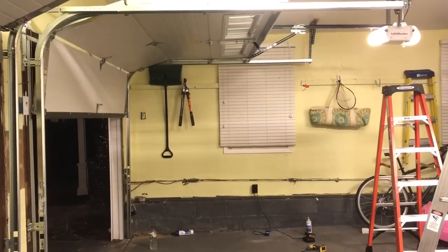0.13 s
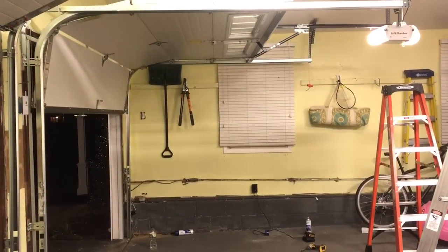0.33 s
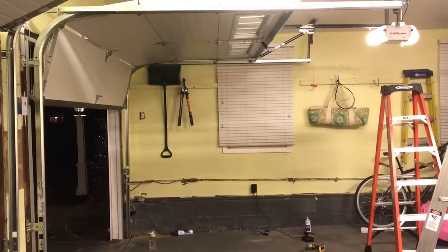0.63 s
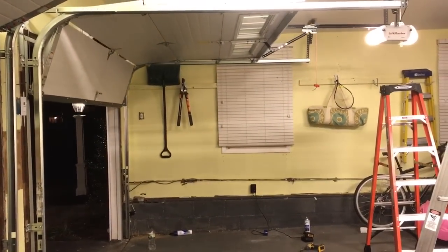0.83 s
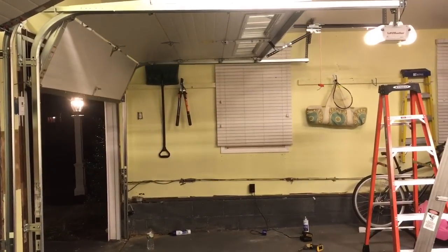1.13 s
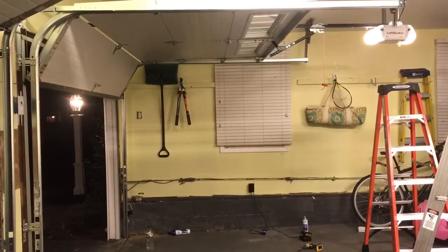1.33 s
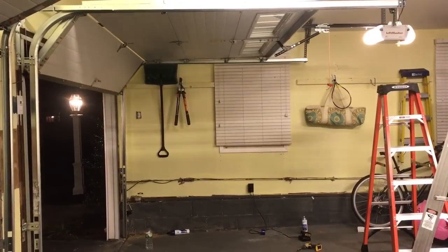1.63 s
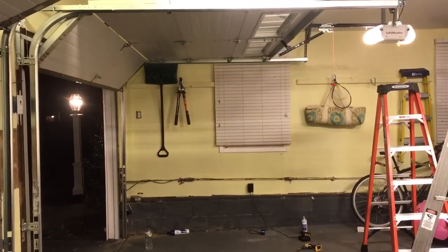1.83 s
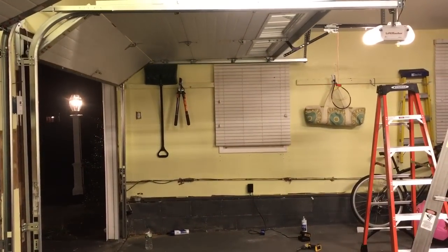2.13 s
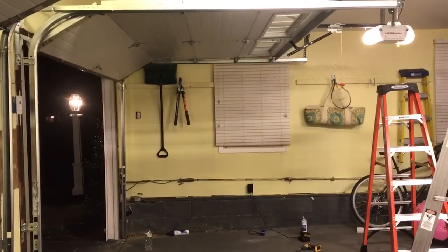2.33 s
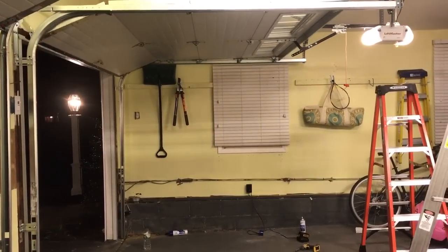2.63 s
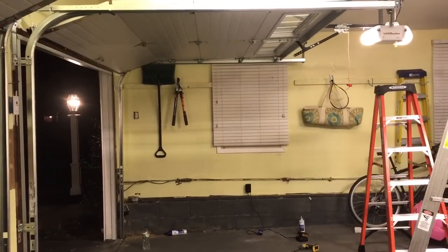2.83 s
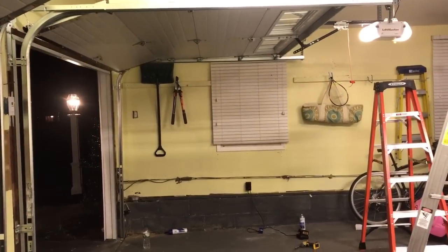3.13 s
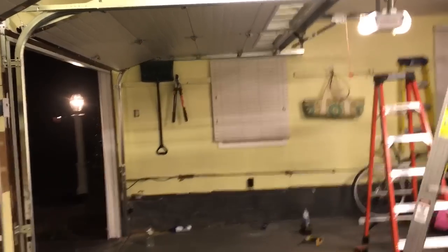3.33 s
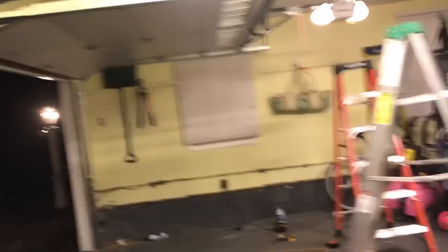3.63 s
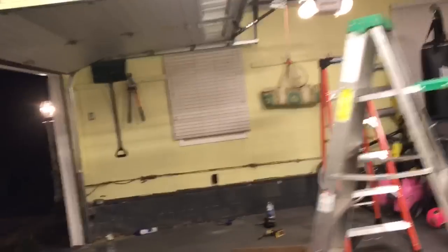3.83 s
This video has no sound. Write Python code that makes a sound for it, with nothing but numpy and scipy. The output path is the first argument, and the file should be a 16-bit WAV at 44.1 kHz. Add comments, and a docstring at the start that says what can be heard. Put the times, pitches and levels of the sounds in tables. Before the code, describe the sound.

A garage door opener drones with a low electric hum and faint gear whine while door panels rumble, rollers grind and fittings rattle. Small clanks begin around 1.3 seconds; louder, chattering metal clanks with a short squeal and creak come at 2.1-2.6. At about 2.9 the motor cuts out and the door shudders low, fading into quiet air. Light clicks and a soft rub near the microphone follow around 3.75.

```python
"""A motor hums at twice the mains rate over a gear whine: an opener pulls a sectional door up its tracks.
Filtered noise makes the panel rumble, roller grind and rattle; decaying modes and noise make the clanks.
Rollers squeal and a hinge creaks in the bend; the motor cuts out and the door shudders to rest.
Light clicks and a soft rub follow near the microphone; faint air noise and tones lie under it all."""
import sys
import numpy as np
from scipy import signal
from scipy.fft import rfft, irfft, next_fast_len
from scipy.io import wavfile
from scipy.ndimage import map_coordinates

SR = 44100
rng = np.random.default_rng(int(sys.argv[2]) if len(sys.argv) > 2 else 0)


def materialize(psi):
    """Save the field psi as 16-bit PCM at rate SR to the path in sys.argv[1].

    A 1-D psi becomes a single channel; in a 2-D psi each row is a channel.
    """
    bounded = np.clip(np.atleast_2d(psi).T, -1, 1)
    quanta = np.round(bounded * 32767).astype(np.int16)
    wavfile.write(sys.argv[1], SR, quanta)


N = 176400


def amp(db):
    """Decibels to gain."""
    return 10 ** (np.asarray(db) / 20)


def unit(x):
    """Scale to rms 1."""
    return x / np.sqrt(np.mean(x ** 2) + 1e-20)


def along(points, hz):
    """Interpolate (frequency [Hz], value) points on a log-frequency axis."""
    f, v = np.transpose(points)
    return np.interp(np.log(hz + 1), np.log(f + 1), v)


def curves(rows):
    """One value per sample for each column after the time."""
    time_s, *columns = np.transpose(rows)
    return [np.interp(np.arange(N) / SR, time_s, column) for column in columns]


def wobble(knots_per_s):
    """Smooth random curve: a spline through normal draws."""
    knots = rng.standard_normal(int(N * knots_per_s / SR) + 4)
    return map_coordinates(knots, [np.arange(N) * knots_per_s / SR])


def random_phase():
    """Uniform phase in radians."""
    return rng.uniform(0, 2 * np.pi)


def filtered(x, response):
    """Multiply the spectrum of x by a response of frequency."""
    m = next_fast_len(len(x) + SR // 4)
    return irfft(rfft(x, m) * response(np.fft.rfftfreq(m, 1 / SR)), m)[:len(x)]


def noise(colour, size=N):
    """Noise of rms 1 with a (frequency [Hz], level [dB]) spectrum."""
    return unit(filtered(rng.standard_normal(size), lambda hz: amp(along(colour, hz))))


def fade(t, t60):
    """Full level until t = 0, then exponential decay, 60 dB in t60 seconds."""
    return amp(-60 * np.maximum(t, 0) / t60)


def add(track, start_s, sound):
    """Mix a sound into the track in place."""
    part = track[round(start_s * SR):][:len(sound)]
    part += sound[:len(part)]


# reverberation of the hard-walled garage: (frequency [Hz], t60 [s])
GARAGE_T60 = [(150, 0.43), (1000, 0.49), (3000, 0.44), (6000, 0.43), (10000, .26), (16000, 0.14)]
WET_DB = 2  # tail energy against direct sound


def garage(x, wet_db):
    """Direct sound plus a fresh noise tail whose treble dies first; total energy stays about equal."""
    hz, t, z = signal.stft(rng.standard_normal(SR), SR, nperseg=256)
    decay = amp(-60 * t / along(GARAGE_T60, hz)[:, None])
    tail = signal.istft(z * decay, SR, nperseg=256)[1]
    response = amp(wet_db) * tail / np.linalg.norm(tail)
    response[0] += 1
    return signal.fftconvolve(x, response)[:N] / np.sqrt(1 + amp(wet_db) ** 2)


MAINS_HZ, SHAFT_HZ = 59.96, 29.27
SPEED_WANDER = .0011  # fraction of shaft speed per unit of wobble
HUM_WAVER_DB, OVERTONE_WAVER_DB, GEAR_WAVER_DB = 0.28, 1.7, 1.6
MESH_ORDER, MESH_DB, MESH_SWING_RAD = 48, -55, 0.82  # tooth whine, phase swing once a turn
STOP_S, WHINE_STOP_S = 2.862, 2.815  # current is cut; gear unloads
HUM_T60_S, WHINE_T60_S = .12, .2
# motor hum under load: (time [s], level [dB])
HUM_LEVEL = [(0, -33), (.1, -35.2), (.23, -33.5), (1.2, -32.5), (1.76, -31.4), (2.16, -29.9), (2.46, -32.5),
             (2.58, -31), (2.8, -33)]
# hum and overtones: (multiple of mains rate, level against hum [dB])
HUM_ORDERS = [(2, 0), (4, -18.5), (6, -29), (8, -35), (10, -41.5)]
# gear train tones: (multiple of shaft rate, level [dB])
GEAR_ORDERS = [(7, -64.5), (10, -61), (13, -69), (14, -64), (33, -67.5), (44, -73.5)]
# tooth whine: (time [s], level against MESH_DB [dB], throb depth once a turn [0-1])
MESH_COURSE = [(0, 2, 0.23), (.6, -1.5, 0.1), (1.1, -3, 0.27), (1.3, -1, 0.33), (1.55, -9, 0.7),
               (1.9, 2, 0.6), (2.1, -3.5, 0.2), (2.8, -1.5, .2)]


def motor():
    """Magnetic hum locked to the mains; the gear turns slightly off centre, so its whine swings once a turn."""
    t = np.arange(N) / SR
    mains = 2 * np.pi * MAINS_HZ * t + 0.044 * wobble(15)
    hum = np.zeros(N)
    for order, db in HUM_ORDERS:
        waver_db = HUM_WAVER_DB if order == 2 else OVERTONE_WAVER_DB
        hum += amp(db + waver_db * wobble(13)) * np.sin(order * mains + random_phase())

    shaft = 2 * np.pi * np.cumsum(SHAFT_HZ * (1 + SPEED_WANDER * wobble(7.2))) / SR
    gear = np.zeros(N)
    for order, db in GEAR_ORDERS:
        phase = order * shaft + 0.25 * wobble(15) + random_phase()
        gear += amp(db + GEAR_WAVER_DB * wobble(7.66)) * np.sin(phase)

    mesh_db, throb = curves(MESH_COURSE)
    mesh_gain = amp(MESH_DB + mesh_db + wobble(7.9)) * (1 + throb * np.sin(shaft))
    mesh = mesh_gain * np.sin(MESH_ORDER * shaft + MESH_SWING_RAD * np.sin(shaft))

    hum *= amp(curves(HUM_LEVEL)[0]) * fade(t - STOP_S, HUM_T60_S)
    whine = (gear + mesh) * fade(t - WHINE_STOP_S, WHINE_T60_S)
    return np.sqrt(2) * (hum + whine)  # sine levels are rms


# rolling door: (time [s], panel rumble [dB], roller noise [dB], rattle [dB])
ROLL_LEVELS = [(0, -48.5, -54.5, -59.5), (1.2, -48, -56, -61), (1.55, -49, -54, -58),
               (1.85, -53, -58.5, -59), (2.02, -49.5, -57, -62.5), (2.25, -49, -51.5, -57.5),
               (2.55, -49.5, -54, -58), (2.76, -48.5, -58, -62), (2.85, -47, -54, -59),
               (3.02, -56, -65.5, -67), (3.25, -72, -75, -97), (3.6, -89, -75, -100)]
# spectra of panels, rollers and rattle: (frequency [Hz], level [dB])
PANEL_COLOUR = [(110, -7), (150, 0), (200, 3.5), (260, 3), (320, 1), (400, -0.5), (470, -16), (650, -16),
                (1200, -47)]
ROLLER_COLOUR = [(300, -22), (470, -2), (580, -6), (730, 7.5), (900, -2), (1150, -3), (1500, -3.5),
                 (1900, -20), (2600, -28.5)]
RATTLE_COLOUR = [(1000, -47), (1800, 5.5), (2400, 0), (3100, 3.5), (3900, -1.5), (4550, -2), (4950, -9),
                 (5800, -4), (6800, -10), (7700, -12), (9300, -15.5), (10400, -21.5), (11400, -19),
                 (13000, -20), (16000, -11)]
# low swaying of the door: (time [s], level [dB])
SWAY_LEVEL = [(0, -45), (.5, -48), (.7, -42.5), (.95, -48.5), (1.9, -48.5), (2.4, -48.5), (2.8, -43.5),
              (2.95, -53.5), (3.25, -50), (3.5, -56), (3.7, -51.5), (4, -58)]
# sway spectrum: (frequency [Hz], level [dB])
SWAY_COLOUR = [(20, -26), (35, -7), (48, -7.5), (60, 3), (80, -0.5), (100, 1), (125, -7.5), (160, -14),
               (300, -55)]
# ticks of chain links and loose rollers; level against the steady rattle
TICKS_PER_S, TICKS_DB, TICK_T60_S, TICK_SCATTER_DB = 130, -1, 0.024, 4.5


def door():
    """Panels sway and rumble, rollers grind in the tracks, and chain and loose fittings tick densely."""
    panel_db, roller_db, rattle_db = curves(ROLL_LEVELS)
    chain = np.sin(np.pi * SHAFT_HZ * np.arange(N) / SR)  # half the shaft rate
    panels = amp(panel_db + 2.0 * wobble(12)) * noise(PANEL_COLOUR)
    rollers = amp(roller_db + wobble(10.2) + .5 * chain) * noise(ROLLER_COLOUR)

    strengths = amp(TICK_SCATTER_DB * rng.standard_normal(N))
    contacts = (rng.random(N) < TICKS_PER_S / SR) * strengths
    tick_decay = fade(np.arange(SR // 10) / SR, TICK_T60_S)
    ticks = signal.fftconvolve(contacts, tick_decay)[:N] * noise(RATTLE_COLOUR)
    ticks = amp(TICKS_DB) * unit(garage(ticks, WET_DB))
    rattle = amp(rattle_db + 0.12 * wobble(7)) * unit(noise(RATTLE_COLOUR) + ticks)

    sway = amp(curves(SWAY_LEVEL)[0] + 0.81 * wobble(9.06)) * noise(SWAY_COLOUR)
    return panels + rollers + rattle + sway


SHUDDER_S, SHUDDER_RISE_S = 2.85, .03  # onset, rise time constant
# modes of the halted door: (frequency [Hz], peak level before decay [dB], t60 [s])
SHUDDER_MODES = [(76.4, -44, 1.6), (102.1, -37, 0.95), (116, -37, .75), (176, -47, 0.55), (271, -53, 0.7),
                 (309, -49, 0.69), (790, -63, 3.2)]


def shudder():
    """The sudden halt sets decaying modes of the door ringing, each with a wavering phase."""
    t = np.maximum(np.arange(N) / SR - SHUDDER_S, 0)
    modes = np.zeros(N)
    for hz, db, t60 in SHUDDER_MODES:
        modes += amp(db) * fade(t, t60) * np.sin(2 * np.pi * hz * t + 0.31 * wobble(14))
    return (1 - np.exp(-t / SHUDDER_RISE_S)) * modes


# hinge and roller clanks: (time [s], gain [dB], body [dB], middle [dB], treble [dB],
# noise t60 [s], bright snap against gain [dB])
CLANKS = [(1.277, -58, 4, 2, -7, 0.073, -25), (1.500, -55.5, -5, 5.5, 2, 0.29, -6),
          (1.707, -57, 0, 3, 0, 0.15, -17), (1.776, -55.5, 6, 3.5, 1.5, 0.21, -14),
          (2.167, -49.5, 3, 0, -5, 0.092, -1), (2.205, -44, -11, -12, -9, .08, -24),
          (2.290, -40, 4.5, 2, 1, 0.082, 3.5), (2.424, -41, 3, -1.5, -0.5, 0.094, -6),
          (2.545, -57.5, 13, 7.5, -8, 0.11, -25), (2.5829, -43, 7, 8.5, -1, 0.062, -4),
          (2.625, -54, 0, 0, -4, 0.08, -25), (2.865, -62.5, 13, 8.5, -7, 0.18, -25),
          (3.141, -65.5, -9, -8, -6, 0.018, -10)]
# spectrum of the clank noise: (frequency [Hz], level [dB])
CLANK_COLOUR = [(200, -49), (550, -17), (820, 6.5), (1200, 4.5), (1700, 3.5), (2600, -1), (3700, -1.5),
                (4500, -2), (5000, -7), (6400, -3), (7600, -7), (8500, -9), (9300, -16), (11100, -11),
                (13000, -28), (16000, -36)]
# ringing of hinge and track: (frequency [Hz], relative level [dB], t60 [s])
STEEL_MODES = [(837, 2, .2), (1124, -2, .3), (1556, -4, 0.12), (1700, -8, .2), (1935, -1.5, 0.15),
               (2416, -4.5, .2), (3210, -9, .15), (3805, -6, 0.17), (4570, -9, .15), (5050, -7, 0.072),
               (6340, -4, .07), (6360, -3, 0.065), (8500, -8, .08), (11400, 0, 0.088)]
# spectrum of the steel-on-steel snap: (frequency [Hz], level [dB])
SNAP_COLOUR = [(4000, -23), (6400, 4), (7500, -3), (8500, -6), (9300, -10), (11100, -3), (12800, -22),
               (14000, -14), (16000, -16)]
STEEL_DB, MODE_SCATTER_DB, ATTACK_S = -6.5, 2.5, .0005  # ring, its scatter, rise time constant
CRACK_DB, CRACK_T60_S = 6.5, 0.0087  # each chatter contact
CHATTER_S, CHATTER_LOSS_DB = .0075, 4  # nominal gap, loss per contact of a loose hinge
SNAP_T60_S, SNAP_WET_DB = .04, -4


def steel_ring(t):
    """Struck hinge and track: decaying modes with scattered levels, scaled by their first 20 ms."""
    ring = np.zeros(len(t))
    for hz, db, t60 in STEEL_MODES:
        gain = amp(db + rng.normal(0, MODE_SCATTER_DB))
        ring += gain * fade(t, t60) * np.sin(2 * np.pi * hz * t + random_phase())
    return amp(STEEL_DB) * ring / np.std(ring[:SR // 50])


def chatter_envelope(t):
    """A loose hinge strikes and bounces three times, weaker each time."""
    contacts_s = np.append(0, np.cumsum(CHATTER_S * rng.uniform(0.65, 1.3, size=3)))
    envelope = np.zeros(len(t))
    for k, contact_s in enumerate(contacts_s):
        gain = amp(CRACK_DB - CHATTER_LOSS_DB * k)
        envelope += gain * (t >= contact_s) * fade(t - contact_s, CRACK_T60_S)
    return envelope


def clanks():
    """Each jolt snaps, chatters, rings the steel and shakes the panel as decaying noise."""
    track, t = np.zeros(N), np.arange(SR // 2) / SR
    attack = 1 - np.exp(-t / ATTACK_S)
    for start_s, db, body_db, middle_db, treble_db, t60, snap_db in CLANKS:
        ring = steel_ring(t) * fade(t, 3 * t60)
        envelope = amp(1) * fade(t, t60) + chatter_envelope(t)  # 1 dB panel noise
        jolt = attack * (ring + noise(CLANK_COLOUR, size=len(t)) * envelope)
        tone = [(1000, body_db), (1900, middle_db), (2800, middle_db),
                (4200, 0), (6300, treble_db), (11000, treble_db - 4.5)]
        jolt = filtered(jolt, lambda hz: amp(along(tone, hz)))
        add(track, start_s, amp(db) * garage(jolt, WET_DB))
        snap = noise(SNAP_COLOUR, size=len(t)) * fade(t, SNAP_T60_S)
        add(track, start_s, amp(db + snap_db) * garage(snap, SNAP_WET_DB))
    return track


# roller scuffs in the bend: (time [s], length [s], squeal level [dB], hiss level [dB])
SCUFFS = [(2.074, 0.046, -54.5, -61), (2.12, 0.063, -60, -96), (2.803, 0.036, -68, -66)]
# spectra of squeal and hiss: (frequency [Hz], level [dB])
SQUEAL_COLOUR = [(4000, -10), (5200, -7), (6000, -1), (7000, -5), (7800, -10), (9300, -21), (10500, -31)]
HISS_COLOUR = [(6000, -25), (9000, 4.5), (11000, -5), (14000, -3), (15200, 3), (16000, -3)]
# dry hinge creaks: (time [s], level [dB])
CREAKS = [(2.167, -43), (2.206, -44)]
# creak spectrum: (frequency [Hz], level [dB])
CREAK_COLOUR = [(1150, -35), (1420, 4), (1540, 3), (1620, -5), (1850, -52)]
SCUFF_RELEASE_T60_S, CREAK_T60_S = 0.066, 0.068


def friction():
    """Rollers scuff and squeal in the bend and a hinge creaks as it folds: noise with a fast flutter."""
    track, t = np.zeros(N), np.arange(SR // 2) / SR
    for start_s, length_s, squeal_db, hiss_db in SCUFFS:
        squeal = amp(squeal_db) * noise(SQUEAL_COLOUR, size=len(t))
        hiss = amp(hiss_db) * noise(HISS_COLOUR, size=len(t))
        add(track, start_s, (squeal + hiss) * fade(t - length_s, SCUFF_RELEASE_T60_S))
    for start_s, db in CREAKS:
        add(track, start_s, amp(db) * noise(CREAK_COLOUR, size=len(t)) * fade(t, CREAK_T60_S))
    return garage(track * amp(1.8 * wobble(250)), wet_db=-1.5)


# light clicks near the microphone: (time [s], level [dB], t60 [s])
CLICKS = [(3.7424, -44, 0.016), (3.751, -49.5, 0.026), (3.768, -57.5, 0.083), (3.781, -58, 0.066),
          (3.814, -62, 0.11)]
# click spectrum: (frequency [Hz], level [dB])
CLICK_COLOUR = [(300, -20), (1200, 3.5), (2200, -4.5), (4000, -2.5), (5600, -1.5), (7500, -6.5),
                (10500, -4), (13000, -8), (16000, -5)]
CLICK_WET_DB = 1


def clicks():
    """Something clicks lightly: short decaying bursts of noise."""
    track, t = np.zeros(N), np.arange(SR // 4) / SR
    for start_s, db, t60 in CLICKS:
        burst = noise(CLICK_COLOUR, size=len(t)) * fade(t, t60)
        add(track, start_s, amp(db) * garage(burst, CLICK_WET_DB))
    return track


# rub as the microphone is moved: (time [s], level [dB])
HANDLING_LEVEL = [(3.66, -69), (3.72, -63), (3.85, -62.5), (4, -64)]
# rub spectrum: (frequency [Hz], level [dB])
HANDLING_COLOUR = [(60, -19), (210, 3.5), (330, -7), (600, -12), (1200, -17), (2500, -24), (6000, -25),
                   (12000, -31), (16000, -22)]


def handling():
    """A soft rub as the microphone is moved: low noise of unsteady level, faint from the start."""
    return amp(curves(HANDLING_LEVEL)[0] + 1.7 * wobble(29)) * noise(HANDLING_COLOUR)


# air spectrum: (frequency [Hz], level [dB])
AIR_COLOUR = [(60, -15), (130, -1.5), (215, -0.5), (355, -12), (430, -13), (552, -11.5), (630, -13.5),
              (780, -14), (920, -5), (1050, -13), (1500, -21), (2080, -26), (2350, -28.5), (5600, -33),
              (7500, -34), (12000, -40), (15800, -32)]
# faint wavering tones: (frequency [Hz], level [dB])
AIR_TONES = [(463, -88), (748, -80.5), (926, -82), (5749, -91.5), (11509, -93)]
AIR_DB = -63


def air():
    """Night air through the open door as steady noise, with a few faint wavering tones."""
    t = np.arange(N) / SR
    tones = np.zeros(N)
    for hz, db in AIR_TONES:
        tones += amp(db + 2 * wobble(3.86)) * np.sin(2 * np.pi * hz * t + wobble(18))
    return amp(AIR_DB) * noise(AIR_COLOUR) + np.sqrt(2) * tones


def scene():
    """Sum of all sources, one channel."""
    mechanism = motor() + door() + shudder() + clanks() + friction()
    return (mechanism + clicks() + handling() + air())[None]


# microphone response: (frequency [Hz], gain [dB])
MIC_RESPONSE = [(20, -3), (35, -0.5), (7000, 0), (7600, -2), (8500, 0.5), (9700, 0), (10450, -2),
                (11200, 1), (12500, 1), (16000, -6.5)]
TOP_HZ = 15850  # band limit


def record(dry):
    """Microphone colouring and a sharp upper band limit."""
    def response(hz):
        return amp(along(MIC_RESPONSE, hz)) * (hz < TOP_HZ)
    return np.array([filtered(channel, response) for channel in dry])


dry = scene()
out = record(dry)
materialize(out)
```